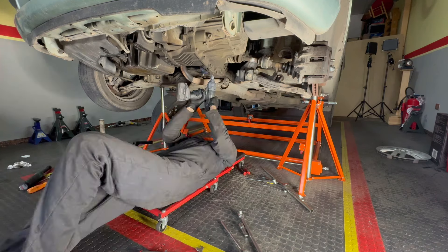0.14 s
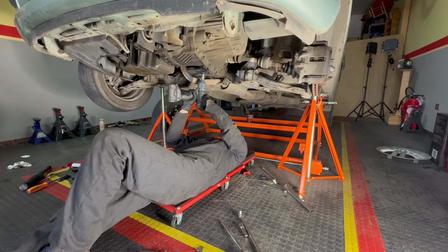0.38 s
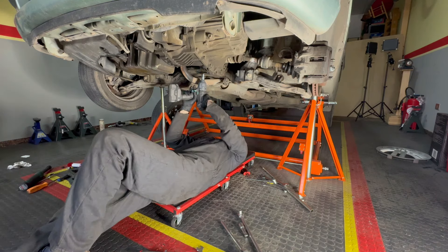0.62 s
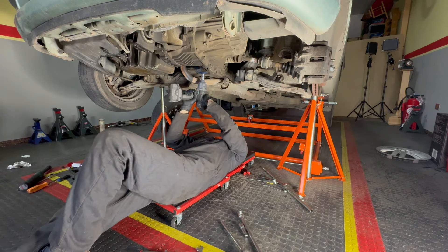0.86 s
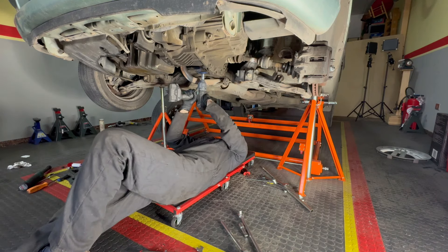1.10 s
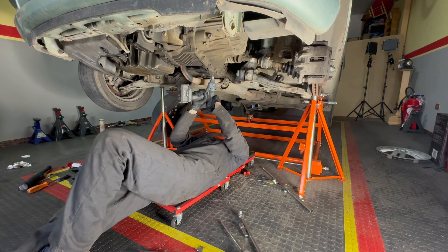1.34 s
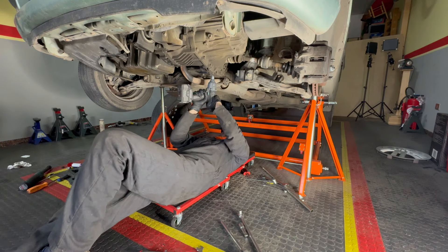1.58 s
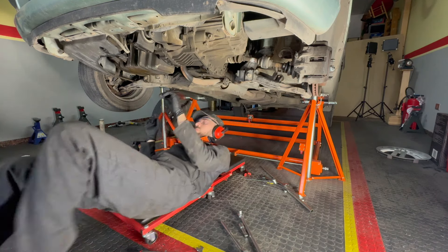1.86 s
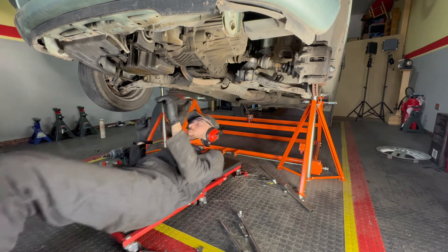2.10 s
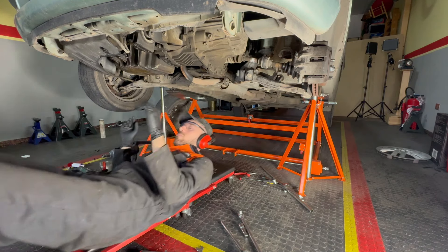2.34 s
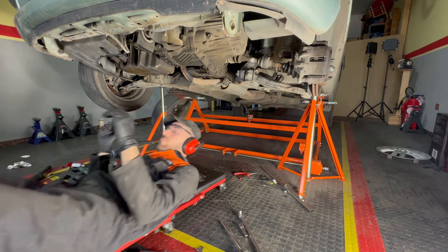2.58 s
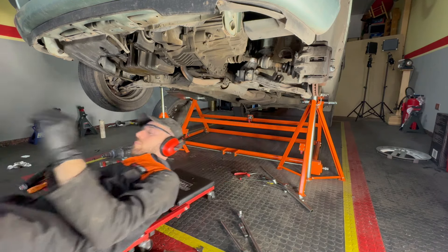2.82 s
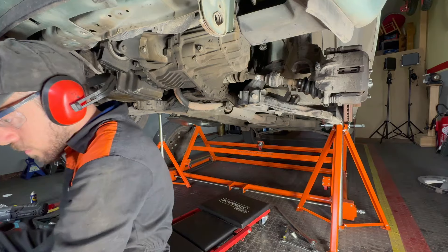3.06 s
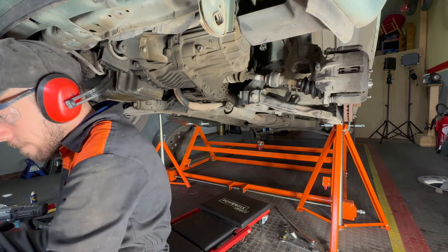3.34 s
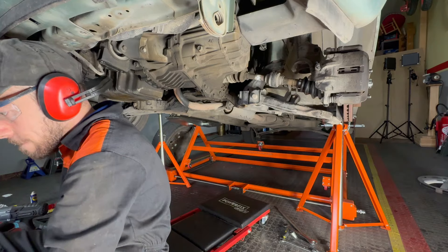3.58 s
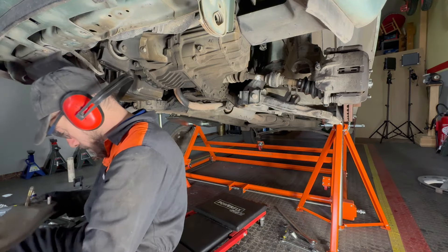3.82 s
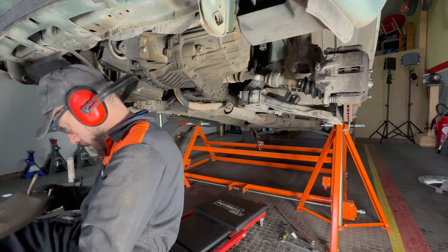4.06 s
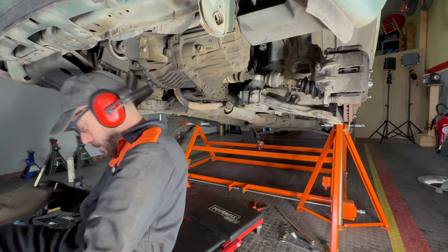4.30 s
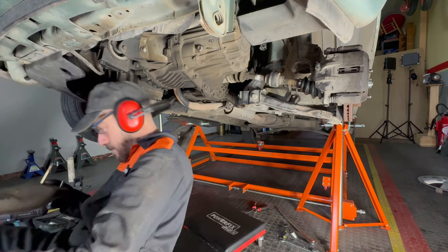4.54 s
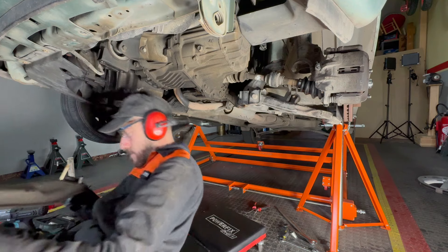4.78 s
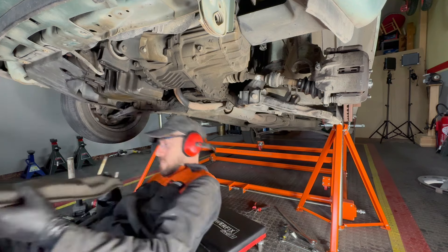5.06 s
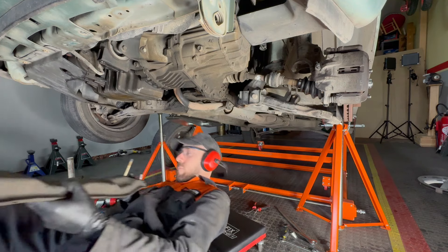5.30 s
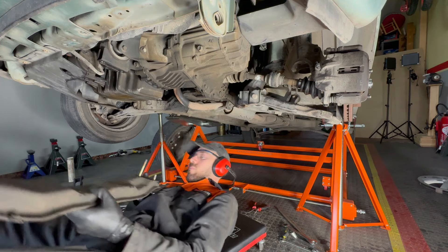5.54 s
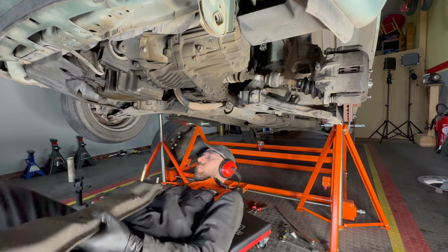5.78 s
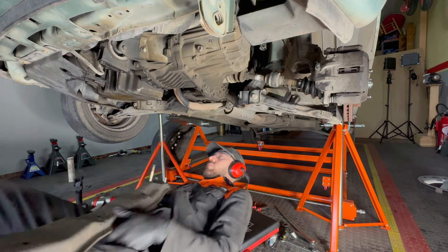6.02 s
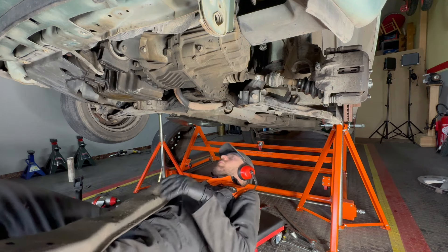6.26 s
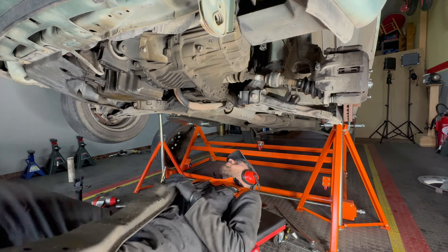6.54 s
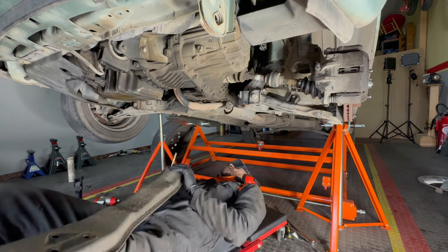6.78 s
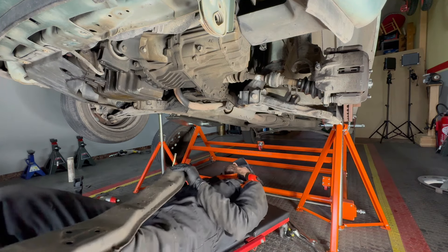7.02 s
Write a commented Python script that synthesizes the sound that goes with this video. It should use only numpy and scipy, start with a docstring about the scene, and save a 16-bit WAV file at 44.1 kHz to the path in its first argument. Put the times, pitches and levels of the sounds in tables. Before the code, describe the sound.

An impact wrench hammers in ringing metallic bursts under a raised car, then a creeper rolls and thumps across studded floor, with clothing rustle and steel tool clinks.

```python
"""In a garage, under a raised car: an impact wrench hammers a bolt in bursts of swelling, ringing rattle.
Close by, a creeper rolls and thumps over a studded rubber floor: contact noise that follows its movement.
Clothes rustle as swelling noise; steel tools clink and tick as fading modes and bursts; low tones boom.
The room answers with a diffuse tail that stops dead at set moments, over a faint hiss and a late hum.
In the stereo pickup the noises are least alike in the middle range, and the loudest peaks clip."""
import sys
import numpy as np
from scipy import signal
from scipy.fft import rfft, irfft, next_fast_len
from scipy.io import wavfile

SR = 44100
rng = np.random.default_rng(int(sys.argv[2]) if len(sys.argv) > 2 else 0)


def convert_level_to_amplitude(level_db):
    """Map a level in decibels to its linear amplitude factor."""
    exponent = np.asarray(level_db, float) / 20
    return 10 ** exponent


def wav_out(sig):
    """Save sig, one row per channel (or a flat mono array), as 16-bit PCM at SR to the path in sys.argv[1]."""
    wavfile.write(sys.argv[1], SR, np.round(np.clip(np.atleast_2d(sig).T, -1, 1) * 32767).astype(np.int16))


N = 314874
T = np.arange(N) / SR

# bounds of the stretches of time; tails and booms stop dead at each: time [s]
STOPS_S = [0, .845, 1.34, 1.7385, 3.02, 3.74, 7.2]

# hammer blows: (time [s], strength [dB], clang centre [Hz], relative underbody ring [dB])
BLOWS = [(0.0182, -9, 2850, 4.5), (0.0518, -5, 2650, 1), (.082, -11.5, 2900, -19), (0.11, -11, 2530, 14),
         (0.146, -5, 3350, 8), (0.171, -26.5, 3600, -2), (0.201, -12, 4000, -12), (0.2285, -4, 3770, 6),
         (0.256, -16, 3300, 11), (0.283, -10, 4180, -1), (0.31, -4.5, 3950, -1), (0.3357, -10.5, 4000, 13),
         (0.363, -5, 4320, -7), (0.383, -3.5, 2260, 3), (0.432, -8.5, 2270, 8), (0.472, -3, 2240, -7),
         (0.9692, -7, 2500, -10), (0.98, 1, 3140, -17), (1.008, -21, 3460, 10), (1.039, -5, 4200, -16),
         (1.0637, -10.5, 3890, -6), (1.0923, -5.5, 4160, -3), (1.118, -11, 4400, -1),
         (1.145, -7.5, 5770, -5), (1.17, -10, 4230, -16), (1.1966, -4, 5970, -24), (1.2207, -12, 4300, -12),
         (1.245, -6, 3670, 5), (1.272, -10.5, 5740, -6), (1.2954, -12, 4170, -7.5), (1.3256, -4, 2610, 2),
         (1.359, -10.5, 4540, -11), (1.3658, -6.5, 4050, 11.5), (1.4262, -10.5, 4650, 15.5),
         (1.474, -10, 6000, -1), (1.517, -8.5, 6600, 13.5), (1.551, -12.5, 4560, -4),
         (1.5847, -5.5, 4600, 12), (1.615, -16, 4100, 14), (1.644, -12, 4220, 4), (1.672, -11.5, 4070, -7),
         (1.6986, -7.5, 4280, 9), (1.723, -5.5, 4850, -4)]
# colour of the hammered steel: (frequency [Hz], relative level [dB])
STEEL_COLOUR = [(88, -14), (150, -13.5), (205, -6), (359, -14.5), (462, -6.5), (540, -8.5), (860, -7.5),
                (1130, -2.5), (1980, -8.5), (3980, -10.5), (5230, -14), (9180, -18.5), (12500, -18),
                (13800, -10), (15500, -20.5)]
# underbody resonances: (frequency [Hz], width [Hz], relative level [dB])
UNDERBODY_MODES = [(481, 40, -7.5), (701, 22, -7.5), (1082, 16, -3.5), (1131.5, 47, 1.5), (1210, 37, -23),
                   (1410, 80, -19)]
# motor and gears between blows, one list a stretch; the second is the spin-up before the middle burst:
# (time [s], level [dB])
MOTOR_LEVEL = [
    [(0.0, -13), (0.274, -31.5), (0.368, -38), (0.52, -45)],
    [(0.845, -33.5), (0.923, -27), (0.965, -30.5)],
    [(0.965, -23), (1.013, -17), (1.087, -18), (1.147, -21.5), (1.227, -18.5), (1.34, -16.5)],
    [(1.34, -36), (1.582, -17.5), (1.7385, -17.5)],
]
USUAL_BLOW_DB = -8
SWELL_S, SWELL_DB_PER_DB = .0036, -0.67  # swell of a usual blow; harder blows are briefer
JINGLE_DB, JINGLE_DB_PER_DB = 2, -0.44  # socket jingle in a usual blow; it grows less than the blow does

# how the garage tail dies: (frequency [Hz], time to fall 60 dB [s])
GARAGE_T60 = [(60, 1), (300, 0.44), (1200, 0.76), (4000, 0.73), (9000, 0.44), (15000, 0.045)]
# floor pan set booming: (time [s], pitch [Hz], level [dB], time to fall 60 dB [s])
BOOMS = [(0.028, 92.6, -26, 0.6), (0.191, 96, -27, 0.28), (0.319, 82, -20, 0.15),
         (0.461, 81.4, -21.5, 0.69), (.56, 94.4, -23, 1), (.85, 88.2, -33, 2.2), (.975, 93, -33, 0.083),
         (1.036, 85, -21.5, 1.03), (1.18, 78.7, -26, 3), (1.338, 84, -18, 0.091), (1.381, 81.3, -31.5, 4.5),
         (1.66, 93.5, -27, .4)]
BOOM_RISE_S = 0.0049

# how hard creeper and body move, one list a stretch: (time [s], level [dB])
MOVEMENT = [
    [(1.7385, -26), (1.776, -30.5), (1.86, -29.5), (2.0, -36.5), (2.076, -24), (2.186, -24.5),
     (2.62, -22.5), (2.908, -22.5), (2.958, -31), (3.02, -40)],
    [(3.02, -54), (3.048, -44), (3.146, -60), (3.424, -67), (3.518, -63), (3.642, -49), (3.74, -70)],
    [(3.74, -80), (3.99, -72), (4.15, -45.5), (4.23, -21.5), (4.29, -32.5), (4.36, -23.5), (4.55, -28.5),
     (4.67, -37), (4.81, -56), (4.95, -61.5), (5.25, -53.5), (5.38, -52), (5.49, -35.5), (5.57, -56),
     (5.66, -63), (5.95, -52.5), (6.05, -40), (6.12, -37), (6.25, -58), (6.36, -41.5), (6.49, -42.5),
     (6.55, -54.5), (6.67, -55), (6.78, -26.5), (6.89, -29), (7.02, -62), (7.06, -38), (7.14, -47)],
]
FULL_MOVE_DB = -22
# rumble, rattle, cloth, caster in turn: (level at full movement [dB], gain per dB of movement [dB])
MOVEMENT_GAIN = [(-27, 0.97), (-22, 1), (-46, 0.5), (-39.5, 1.26)]
# colour of wheels on studs: (frequency [Hz], relative level [dB])
RUMBLE_COLOUR = [(15, -14), (25, 9), (69, 1.5), (166, 4), (227, 5), (260, 1.5), (303, -5), (400, 0),
                 (520, -14), (880, -120)]
# colour of the creeper frame: (frequency [Hz], relative level [dB])
RATTLE_COLOUR = [(150, -23), (250, -10), (301, -3), (580, -0.5), (1240, -13), (1820, -15), (3000, -29.5),
                 (3900, -61), (6600, -120)]
# colour of rubbing cloth: (frequency [Hz], relative level [dB])
CLOTH_COLOUR = [(1650, 2), (2800, 3), (5330, -4), (8430, -3), (11600, -5), (12600, 4), (14200, 1),
                (15500, 4.5)]
# caster resonances: (frequency [Hz], width [Hz], relative level [dB])
CASTER_MODES = [(4000, 510, -2.5), (8850, 370, 4), (13000, 1600, -8)]
# weight lurching onto the wheels: (time [s], top level [dB], length [s])
LURCHES = [(1.776, -29, .05), (1.9, -27, 0.089), (2.186, -22.5, 0.1), (2.368, -18, 0.058),
           (2.62, -18, 0.13), (2.858, -23.5, 0.094), (2.99, -19, 0.02), (4.18, -28, 0.017),
           (4.36, -25.5, 0.044), (4.71, -36.5, .05), (5.62, -30.5, 0.021), (5.83, -37, 0.069),
           (5.98, -27.5, 0.011), (6.12, -35.5, 0.081), (6.92, -33.5, 0.062)]
# cloth rubbing: (time [s], top level [dB], length [s])
RUSTLES = [(1.776, -43, 0.024), (2.446, -34.5, 0.063), (2.62, -34.5, 0.11), (2.858, -30, 0.057),
           (2.958, -29.5, 0.059), (3.048, -37, .04), (3.2, -34, 0.03), (3.7, -37, 0.043), (3.99, -43, 0.16),
           (4.36, -36, 0.034), (5.57, -48, 0.07), (6.07, -38, 0.057), (6.45, -41.5, 0.094),
           (6.78, -32, 0.057), (7.04, -26.5, 0.023)]

# wheels and elbows thumping: (time [s], peak [dB], pitch [Hz], decay [cycles])
THUMPS = [(2.139, -12.5, 456, 2.6), (2.266, -8.5, 88.8, 0.5), (2.41, -17, 167, 1.4), (2.434, -3, 158, 0.92),
          (2.463, -12, 134, 0.9), (2.537, -15, 470, 2.9), (2.6, -13, 172, 0.45), (2.824, -10, 328, 2.4),
          (2.881, -14, 131, 5.1), (3.621, -33, 523, 2.4), (4.064, -29.5, 710, 0.81), (4.239, -13, 180, 1.7),
          (4.348, -18.5, 190, 3.7), (4.387, -26, 129, 1.3), (4.427, -14, 178, 1.6), (4.472, -6.5, 654, 1.3),
          (4.544, -11, 637, 3.1), (5.397, -33, 940, 3.3), (5.489, -21, 672, 0.75), (5.616, -20, 305, 0.43),
          (5.819, -21, 166, 1.2), (5.977, -18, 171, 2.2), (6.058, -21.5, 171, 2.3), (6.111, -17, 180, 0.77),
          (6.159, -32, 156, 1.8), (6.482, -17.5, 1070, 0.65), (6.78, -3, 564, 2.1), (6.799, -21, 473, 1.1),
          (6.869, -17, 650, 2.5), (7.065, -20, 190, 1.2)]
# dry ticks and snaps: (time [s], body peak [dB], snap over body [dB], time to fall 60 dB [s],
# left minus right [dB])
TICKS = [(1.7777, -24, -12, 0.02, -14), (1.801, -14, -36, 0.023, 5), (1.8544, -14, -11, 0.015, 7),
         (2.0673, -33, -1, .026, -4), (2.1236, -32, 0, .063, 2), (2.1941, -22.5, -8, 0.072, -2),
         (2.2494, -24.5, -2, 0.036, -5), (2.3628, -20.5, -11, 0.064, -4), (2.532, -30.5, 10, .029, -4),
         (2.569, -25, -10, .03, -4), (2.754, -23, -6, 0.035, -5), (2.826, -11, -42, 0.05, 4),
         (2.8766, -15.5, -4, .03, 2), (3.736, -32, 4.5, 0.0044, 24.5), (4.1138, -34.5, -5, 0.035, -3),
         (4.1699, -37.5, 12.5, 0.029, 0), (4.209, -37, 2, 0.052, -2), (4.2355, -18, 13, 0.033, 0.5),
         (4.2437, -20, -14, .03, 7), (4.376, -19, -2.5, 0.057, -3), (4.429, -26.5, 9.5, 0.019, 1),
         (4.4985, -29, 3, .04, -1), (4.5392, -27.5, 6, 0.1, 1), (5.261, -44.5, 9, .033, 3),
         (5.401, -48, 8, .043, 7), (5.492, -36, -2, 0.12, 10), (5.767, -42.5, 10, .05, 0),
         (6.098, -33.5, 8, 0.046, 4.5), (6.1685, -40, 10, 0.033, 6), (6.1924, -30, 16.5, 0.013, 4),
         (6.698, -34, -21, .03, 2), (6.7358, -32, 5, 0.16, -3), (6.783, -17, -30, 0.05, -5),
         (6.8237, -18, -14, 0.021, 0), (7.1296, -18, -18, 0.12, 0)]
# tick body centre, highest near -30 dB, lower for fainter and louder ticks: (body peak [dB], centre [Hz])
TICK_BODY = [(-56, 1050), (-30, 1870), (-16, 1310)]

# small steel parts chiming: (time [s], pitch [Hz], level [dB], time to fall 60 dB [s])
CHIMES = [(3.025, 10430, -38.5, 0.21), (6.775, 8540, -37.5, 0.97)]
# steel bar struck: (time [s], peak [dB], favoured centre [Hz], spread [octaves], left minus right [dB])
BAR_HITS = [(3.028, -29.5, 2540, 0.97, 12), (3.066, -23, 1150, 0.26, -1), (3.093, -11, 1370, 1.1, 7),
            (3.186, 0.5, 3450, 0.87, 2.5), (3.499, -37.5, 1190, 0.602, 5), (3.549, -38.5, 1183, 0.26, 1)]
# modes of the bar: (frequency [Hz], relative level [dB], time to fall 60 dB [s])
BAR_MODES = [(740, -3.5, 0.72), (885, 11.5, 0.14), (1070, -1.5, 0.35), (1200, 7.5, 0.37), (1415, -6, 0.4),
             (1731, 2, 0.13), (1990, -5, 0.27), (2005, 0.5, 0.17), (2096, -3, 0.3), (2220, -12, 0.14),
             (2400, -11.5, 0.13), (2550, -17, 0.2), (2880, -16.5, 0.39), (3450, -21, 0.16),
             (3670, -32.5, 0.24), (4230, -21, 0.25), (4280, -6, 0.07), (4480, -11, 0.12), (5700, -35, 0.36),
             (6500, -23.5, .3), (6500, -19, 0.24), (7000, -7, 0.31), (7540, -25, 0.23), (8230, -11.5, 0.24),
             (9100, -7.5, 0.15)]
# socket struck: (time [s], peak [dB], favoured centre [Hz], spread [octaves], left minus right [dB])
SOCKET_HITS = [(6.307, -43, 3180, 0.39, -6), (6.344, -28, 3150, 0.29, -5), (6.389, -21.5, 3520, 1.75, -5),
               (6.426, -26, 4200, 1.35, 2.5), (6.478, -21.5, 2400, 2.6, -1)]
# modes of the socket: (frequency [Hz], relative level [dB], time to fall 60 dB [s])
SOCKET_MODES = [(800, -0.5, 0.033), (940, -1.5, 0.04), (1757, -4.5, 0.068), (2210, -2.5, 0.023),
                (3090, -5, 0.022), (3300, -13.5, 0.018), (4200, -29, 0.067), (5200, -19.5, 0.14),
                (6600, -22, .09), (8200, -23, .07), (9100, -23, 0.086), (10350, -23, 0.06)]
# spanner struck: (time [s], peak [dB], favoured centre [Hz], spread [octaves], left minus right [dB])
SPANNER_HITS = [(6.8858, -1, 7000, 2.3, 0.0)]
# modes of the spanner: (frequency [Hz], relative level [dB], time to fall 60 dB [s])
SPANNER_MODES = [(1712, 10, 0.076), (2835, -2, 0.25), (4122, 0, 0.3), (4090, -9, 0.81), (4711, -1, 0.48),
                 (5238, 3, .35), (5500, -8, 0.25), (6455, -15.5, .3), (6660, -21, 0.33), (6850, 0, 0.3),
                 (6695, -2, 0.3), (7297, -3, 0.42), (7600, -10.5, .3), (7839, -2, 0.5), (8300, -10.5, 0.25),
                 (8500, -7, 0.25), (8800, -7.5, 0.22), (9100, -2, .3), (9846, -8, .4), (10200, -13, .3),
                 (10580, 2.5, 0.26), (11200, -12.5, .3), (11349, 0, 0.19), (11510, 3, 0.15),
                 (14600, -15.5, 0.14), (14660, -19.5, .15)]

# one low hum: (start [s], pitch [Hz], width of each filter pass [Hz], level [dB])
HUM = (5, 66.5, 25, -48)
# colour of the hiss: (frequency [Hz], relative level [dB])
HISS_COLOUR = [(18, -39), (30, 9), (64, 0), (270, -27), (532, -20), (1080, -10.5), (1970, -4), (2420, 5),
               (3070, -13.5), (4540, -15.5), (5740, -20), (11000, -24.5), (12600, -15), (14000, -38),
               (15500, -78)]
HISS_DB = -47.5

# likeness of the two channels: (frequency [Hz], likeness [0 to 1])
CHANNEL_LIKENESS = [(60, 1), (130, 0.84), (290, 0.9), (640, 0.32), (5000, 0.18), (9500, 0.25),
                    (12000, 0.61), (16000, 1)]
# phase lead of the left channel: (frequency [Hz], lead [radians])
LEFT_LEAD = [(0, -0.5), (400, 0.5), (800, 1.52), (7500, 15.5), (10800, -1), (12300, -3), (15300, -9)]
# difference in colour of the two channels: (frequency [Hz], left minus right [dB])
CHANNEL_COLOUR = [(60, 2), (110, -2), (200, 3), (380, -1), (700, 0.5), (1290, 1), (2380, -1), (4400, 4.5),
                  (8120, 0), (15000, -2)]


def unit(x):
    """Scales to rms 1."""
    return x / np.sqrt(np.mean(x ** 2))


def peak(x):
    """Scales the mean of both channels to peak 1."""
    return x / np.abs(x.mean(axis=0)).max()


def on_log(hz, table):
    """Reads a (frequency [Hz], value) table on a log-frequency axis."""
    at, value = np.transpose(table)
    return np.interp(np.log(hz + 1), np.log(at + 1), value)


def colour(x, table):
    """Causal filter with the (frequency [Hz], level [dB]) shape, from the folded cepstrum."""
    gain = convert_level_to_amplitude(on_log(np.fft.rfftfreq(4096, 1 / SR), table))
    cepstrum = irfft(np.log(gain))
    # folding onto positive time gives minimum phase
    cepstrum[1:2048] *= 2
    cepstrum[2049:] = 0
    response = irfft(np.exp(rfft(cepstrum)))
    response = response.reshape((1,) * (x.ndim - 1) + (-1,))
    return signal.oaconvolve(x, response, axes=-1)[..., :x.shape[-1]]


def ring(x, modes):
    """Sum of (frequency [Hz], width [Hz], level [dB]) resonances driven by x."""
    return sum(convert_level_to_amplitude(db) * signal.lfilter(*signal.iirpeak(hz, hz / width, fs=SR), x)
               for hz, width, db in modes)


def track(curves):
    """Level in dB along curves that each cover their own stretch of time; -120 dB elsewhere."""
    out = np.full(N, -120.)
    for rows in map(np.array, curves):
        inside = (T >= rows[0, 0]) & (T <= rows[-1, 0])
        out[inside] = np.interp(T[inside], rows[:, 0], rows[:, 1])
    return out


def swells(rows):
    """Gain that rises and falls as a bell around each row; overlapping bells add in power."""
    return np.sqrt(sum(convert_level_to_amplitude(2 * db) * np.exp(-((T - s) / length) ** 2 * 2) for s, db, length in rows))


def add(out, s, sound, pan_db=0.):
    """Mixes a short sound in at s seconds, pan_db louder on the left than on the right."""
    i = int(s * SR)
    n = min(sound.shape[-1], N - i)
    out[:, i:i + n] += convert_level_to_amplitude(np.array([[pan_db], [-pan_db]]) / 2) * sound[..., :n]


def stereo(pair):
    """Blends two unrelated signals into two channels: phase-shifted, least alike in the middle range."""
    size = next_fast_len(pair.shape[1] + 64)
    hz = np.fft.rfftfreq(size, 1 / SR)
    like = np.clip(on_log(hz, CHANNEL_LIKENESS), 0, 1)
    right, other = rfft(pair, size)
    lead = np.exp(1j * np.interp(hz, *np.transpose(LEFT_LEAD)))
    left = like * right * lead + np.sqrt(1 - like ** 2) * other
    return irfft([left, right], size)[:, :pair.shape[1]]


def grains(per_s, spread_db):
    """Contacts at random instants, of uneven size, in both channels."""
    hit = rng.random((2, N)) < per_s / SR
    size = convert_level_to_amplitude(spread_db * np.minimum(rng.exponential(size=N), 4))
    return stereo(hit * size * rng.standard_normal((2, N)))


def hiss():
    """Steady coloured noise that leans left."""
    noise = stereo(rng.standard_normal((2, N)))
    return convert_level_to_amplitude(HISS_DB + np.array([[2.2], [-2.2]])) * unit(colour(noise, HISS_COLOUR))


def wrench():
    """Each blow swells and dies as a rattle of hammer, anvil and socket; gears whirr on."""
    t = np.arange(int(.08 * SR)) / SR
    steel = unit(colour(grains(9000, 2.5), STEEL_COLOUR))
    shake = unit(grains(6000, 0.64))
    jingle = unit(ring(grains(8100, 2.0), [(6320, 640, -5.0), (9220, 1600, -3.0), (14000, 3500, 2.8)]))
    gears = unit(colour(grains(9000, 1.35), STEEL_COLOUR))
    whirr = gears + convert_level_to_amplitude(-9.5) * unit(ring(shake, UNDERBODY_MODES))
    out = convert_level_to_amplitude(track(MOTOR_LEVEL)) * whirr
    for s, db, hz, body_db in BLOWS:
        harder_db = db - USUAL_BLOW_DB
        swell_s = SWELL_S * convert_level_to_amplitude(SWELL_DB_PER_DB * harder_db)
        jingle_db = JINGLE_DB + JINGLE_DB_PER_DB * harder_db
        start = s - .012
        now = slice(int(start * SR), int(start * SR) + len(t))
        # loose parts chatter before the full blow lands and after it
        late = (t + start - s - swell_s) / swell_s
        rattle = np.where(late < 0, np.exp(-late ** 2 / 1.78), np.exp(-late / 2.1))
        # the socket seats differently at each blow, so its clang shifts
        clang = ring(steel[:, now] * rattle, [(hz, 0.14 * hz, 6)])
        rest = steel[:, now] + convert_level_to_amplitude(jingle_db) * jingle[:, now]
        # the underbody rings on after the blow has passed
        body = convert_level_to_amplitude(body_db + 8.5) * ring(shake[:, now] * rattle, UNDERBODY_MODES)
        add(out, start, convert_level_to_amplitude(db - 3.5) * (clang + body + rattle * rest))
    return out


def garage(x, wet_db):
    """Adds a diffuse tail, shaped band by band in frequency; it stops dead at each of STOPS_S."""
    t, tail = np.arange(int(.8 * SR)) / SR, 0
    for hz in 50 * 2 ** np.arange(0, 8.4, .5):
        band = ring(rng.standard_normal((2, len(t))), [(hz, hz / 2.5, 0)])
        tail = tail + band * 1000 ** (-t / on_log(hz, GARAGE_T60))
    tail = stereo(tail * np.minimum(t / 0.0016, 1))
    tail = convert_level_to_amplitude(wet_db) * tail / np.sqrt((tail ** 2).sum(axis=1, keepdims=True))
    edges = (np.array(STOPS_S) * SR).astype(int)
    stretches = []
    for a, b in zip(edges, edges[1:]):
        direct = x[:, a:b]
        wet = signal.fftconvolve(direct, tail, axes=1)[:, :min(b, N) - a]
        stretches.append(direct + wet)
    return np.hstack(stretches)


def booms():
    """The floor pan swings up and fades after a shove; each boom stops dead at the next of STOPS_S."""
    out = np.zeros((2, N))
    waver = 1 + 0.39 * unit(ring(rng.standard_normal(N), [(11, 24, 0)]))
    for s, hz, db, t60 in BOOMS:
        stop = min(j for j in STOPS_S if j > s + .004)
        t = np.arange(int((stop - s) * SR)) / SR
        envelope = (1 - np.exp(-t / BOOM_RISE_S)) * 1000 ** (-t / t60)
        add(out, s, convert_level_to_amplitude(db) * np.sqrt(2) * envelope * np.sin(2 * np.pi * hz * t))
    return out * waver


def moving():
    """Wheels bump over the studs, the frame rattles, cloth rubs, casters hiss."""
    rumble = colour(grains(300, 0.76), RUMBLE_COLOUR)
    # slow random swings in dB make the rattle lumpy and the casters judder
    lumps = convert_level_to_amplitude(3.46 * unit(ring(rng.standard_normal(N), [(17.6, 11.6, 0)])))
    rattle = colour(grains(2500, 1.9) * lumps, RATTLE_COLOUR)
    cloth = colour(grains(6000, 2.9), CLOTH_COLOUR)
    judder = convert_level_to_amplitude(5.4 * unit(ring(rng.standard_normal(N), [(6.7, 30, 0)])))
    caster = ring(grains(6300, 1.5) * judder, CASTER_MODES) * convert_level_to_amplitude([[-1.5], [1.5]])
    effort_db = track(MOVEMENT) - FULL_MOVE_DB
    rumble_gain, rattle_gain, cloth_gain, caster_gain = [
        convert_level_to_amplitude(db + per_db * effort_db) for db, per_db in MOVEMENT_GAIN]
    mix = np.hypot(rumble_gain, swells(LURCHES)) * unit(rumble)
    mix = mix + rattle_gain * unit(rattle)
    mix = mix + np.hypot(cloth_gain, swells(RUSTLES)) * unit(cloth)
    mix = mix + caster_gain * unit(caster)
    started = T > MOVEMENT[0][0][0]
    return started * mix


def knocks():
    """Thumps are short, dying swings; ticks are short bursts with a dull body and a bright snap."""
    out, t = np.zeros((2, N)), np.arange(int(.12 * SR)) / SR
    for s, db, hz, cycles in THUMPS:
        envelope = np.exp(-t * hz / max(cycles, .3)) * np.minimum(t * hz / 0.27, 1)
        swing = np.sin(2 * np.pi * hz * t) * envelope
        add(out, s, -convert_level_to_amplitude(db) * swing / np.abs(swing).max())
    for s, db, snap_db, t60, pan_db in TICKS:
        hz = np.interp(db, *np.transpose(TICK_BODY))
        burst = stereo(rng.standard_normal((2, len(t))) * 1000 ** (-t / max(t60, .003)))
        body = ring(burst, [(hz, 0.74 * hz, 0)])
        snap = colour(burst, [(4000, -30.5), (7500, 1.5), (11000, 7)])
        add(out, s, convert_level_to_amplitude(db) * (peak(body) + convert_level_to_amplitude(snap_db) * peak(snap)), pan_db)
    return out


def chimes():
    """Lone thin tones that fade."""
    out, t = np.zeros((2, N)), np.arange(int(.4 * SR)) / SR
    for s, hz, db, t60 in CHIMES:
        add(out, s, convert_level_to_amplitude(db) * np.sin(2 * np.pi * hz * t) * 1000 ** (-t / t60))
    return out


def clinks(hits, modes, crack_db, buzz_db, crack_s, swell_s, split_hz):
    """Each hit starts the modes afresh with a crack; the spot that is struck favours some of them."""
    out, t = np.zeros((2, N)), np.arange(int(.6 * SR)) / SR
    hz, db, t60 = np.transpose(modes)[:, :, None]
    grid = 200 * 2 ** np.arange(0, 7, .25)
    for s, peak_db, spot_hz, octaves, pan_db in hits:
        favour = np.transpose([grid, -4.3 * (np.log2(grid / spot_hz) / octaves) ** 2])
        # random level, phase, split and throb phase of each mode
        luck = rng.standard_normal((4, 2, len(modes), 1))
        # every mode is a close pair, so it throbs as it fades
        throb = 1 + .9 * np.cos(2 * np.pi * (split_hz * luck[2, :1] * t + luck[3]))
        fade = convert_level_to_amplitude(db + 1.5 * luck[0] + on_log(hz, favour)) * 1000 ** (-t / t60)
        tone = (throb * fade * np.sin(2 * np.pi * (hz * t + 0.19 * luck[1]))).sum(axis=1)
        crack = colour(stereo(rng.standard_normal((2, len(t))) * np.exp(-t / crack_s)), favour)
        # the chattering contact also drives the modes, as broad rough bands
        buzz = ring(crack, [(f, 0.025 * f, level) for f, level, _ in modes])
        sound = peak(tone) + convert_level_to_amplitude(crack_db) * peak(crack) + convert_level_to_amplitude(buzz_db) * peak(buzz)
        sound = sound * np.sin(np.pi / 2 * np.minimum(t / swell_s, 1))
        add(out, s, convert_level_to_amplitude(peak_db) * peak(sound), pan_db)
    return out


def hum():
    """A faint, unsteady low tone, noise through two equal resonances, that fades in."""
    s, hz, width, db = HUM
    tone = ring(ring(rng.standard_normal(N), [(hz, width, 0)]), [(hz, width, 0)])
    return convert_level_to_amplitude(db) * unit(tone) * np.clip((T - s) / 0.097, 0, 1)


def scene():
    """The wrench fills the garage; the nearer sounds are drier; booms, hiss and hum stay without tail."""
    bar = clinks(BAR_HITS, BAR_MODES, crack_db=2.9, buzz_db=2.5,
                 crack_s=0.0049, swell_s=0.0011, split_hz=44)
    socket = clinks(SOCKET_HITS, SOCKET_MODES, crack_db=-2, buzz_db=0,
                    crack_s=0.0071, swell_s=0.0066, split_hz=25)
    spanner = clinks(SPANNER_HITS, SPANNER_MODES, crack_db=0.12, buzz_db=1.5,
                     crack_s=0.03, swell_s=0.0046, split_hz=11.6)
    mix = garage(wrench(), wet_db=-4)
    mix = mix + garage(moving() + knocks(), wet_db=-5.5)
    mix = mix + garage(bar + socket, wet_db=-11)
    mix = mix + garage(spanner + chimes(), wet_db=-12)
    return mix + booms() + hiss() + hum()


def top_cut(x):
    """Nothing passes above the cut-off."""
    return signal.sosfilt(signal.butter(12, 15740, fs=SR, output="sos"), x)


def record(dry):
    """The channels differ in colour, deep bass falls away, a gap lies near 12.7 kHz, loud peaks clip."""
    left = colour(dry[0], np.array(CHANNEL_COLOUR) * [1, .5])
    right = colour(dry[1], np.array(CHANNEL_COLOUR) * [1, -.5])
    recording_colour = [(20, -33), (45, -4.5), (70, -2.0), (11600, -1.0), (12200, -12.0), (12450, -36),
                        (12900, -54), (13150, -3.5), (13500, -7)]
    mix = colour(np.array([left, right]), recording_colour)
    return top_cut(np.clip(mix, -1, 1))


dry = scene()
out = record(dry)
wav_out(out)
```